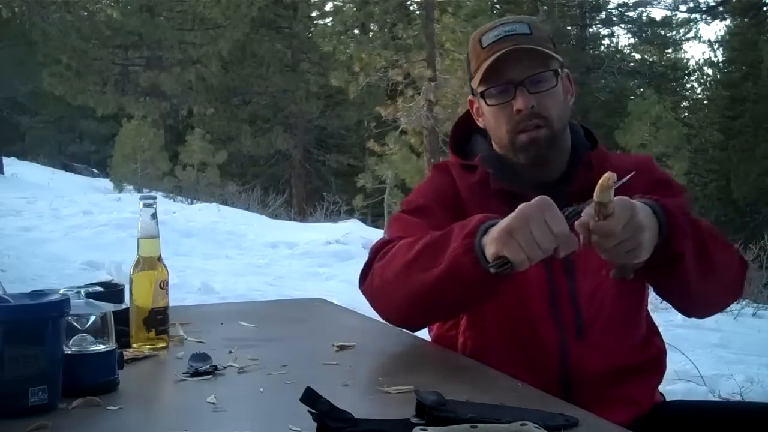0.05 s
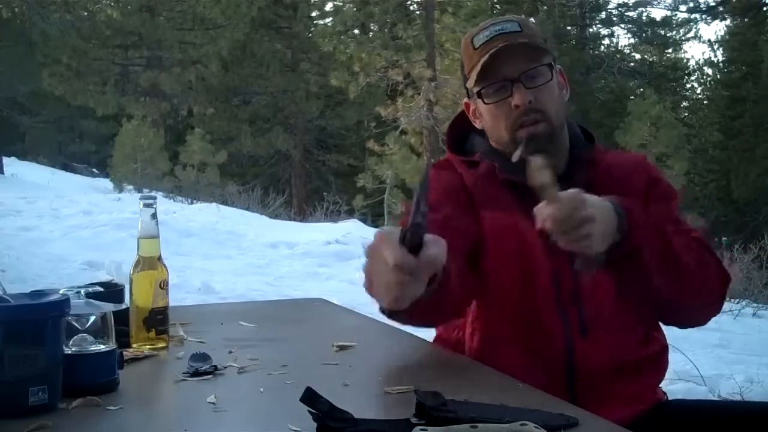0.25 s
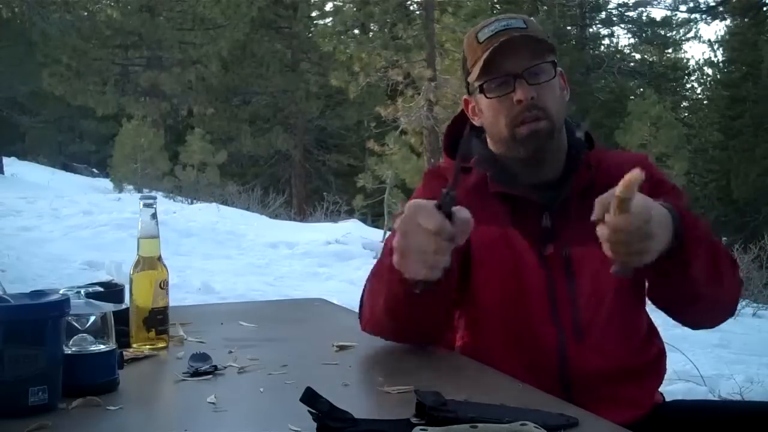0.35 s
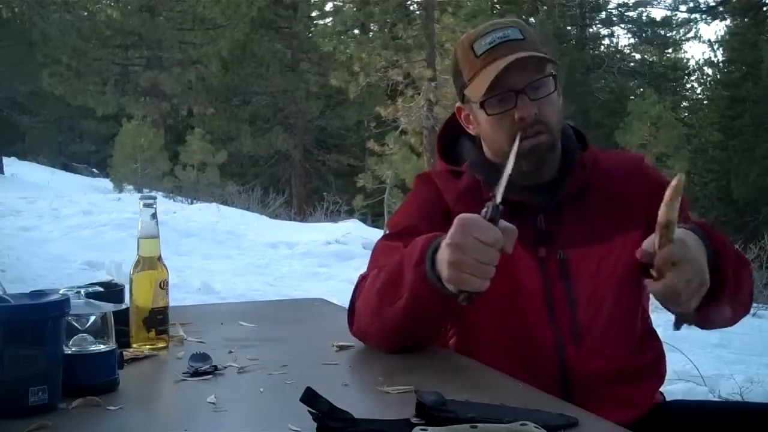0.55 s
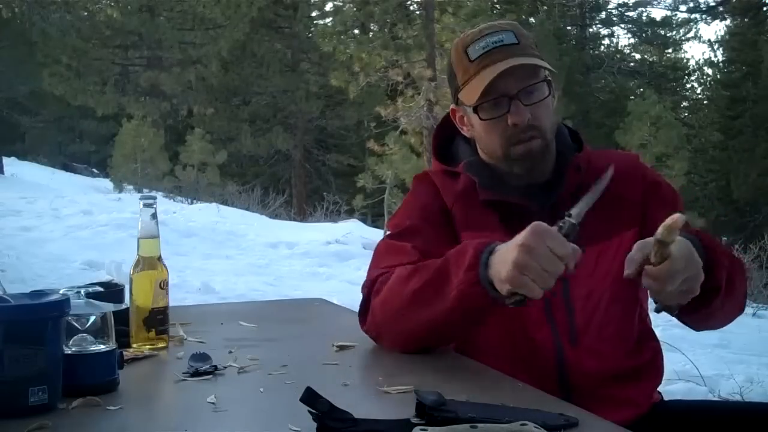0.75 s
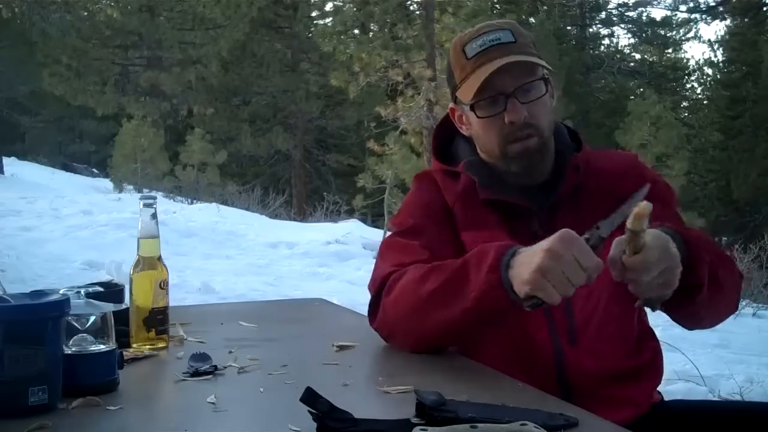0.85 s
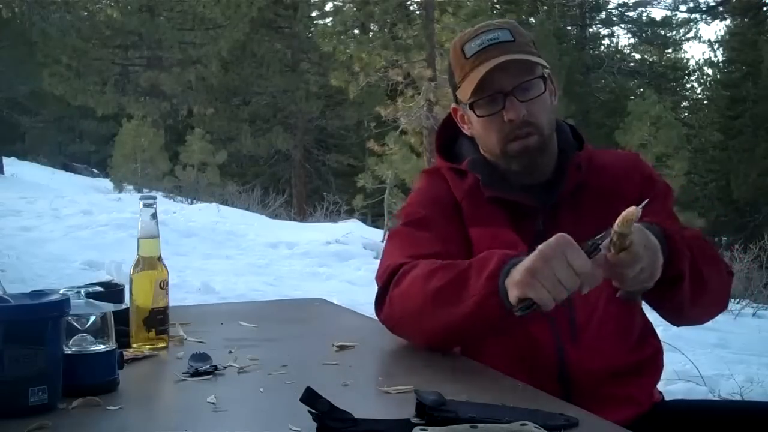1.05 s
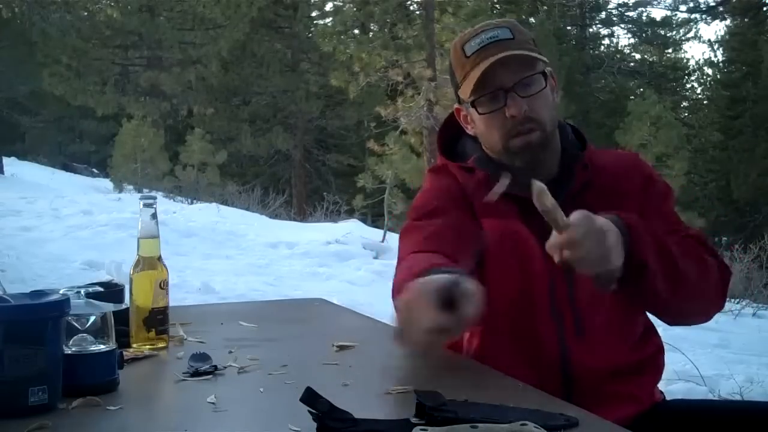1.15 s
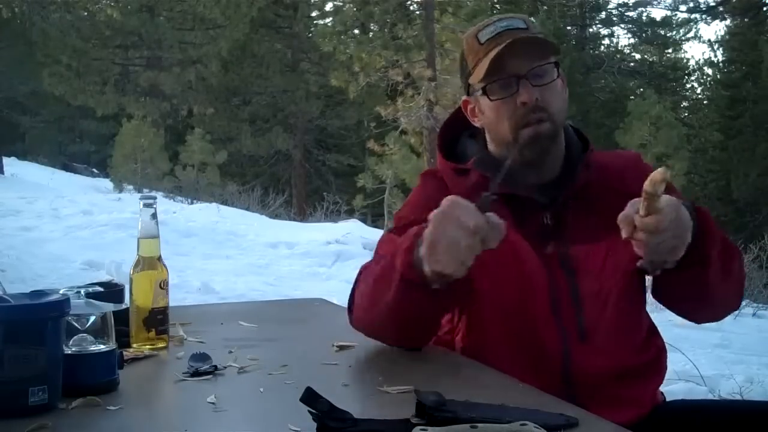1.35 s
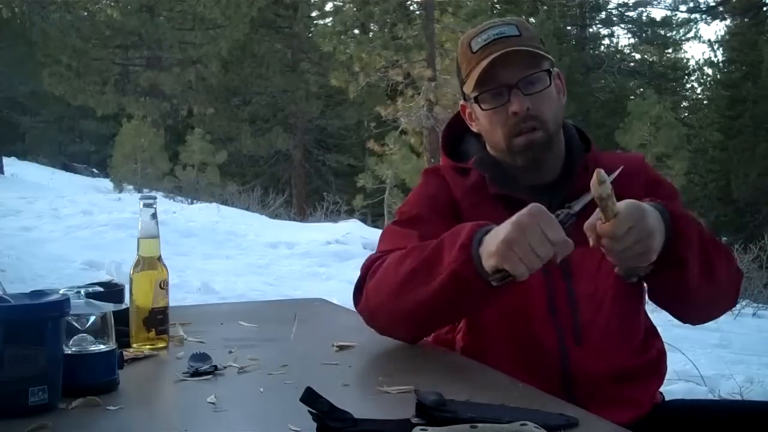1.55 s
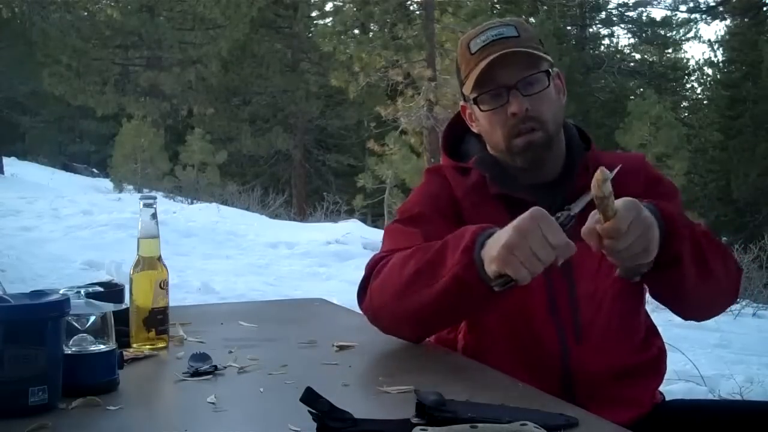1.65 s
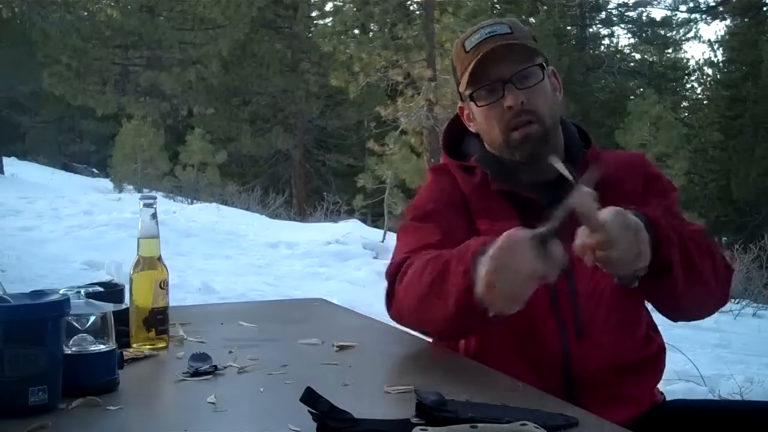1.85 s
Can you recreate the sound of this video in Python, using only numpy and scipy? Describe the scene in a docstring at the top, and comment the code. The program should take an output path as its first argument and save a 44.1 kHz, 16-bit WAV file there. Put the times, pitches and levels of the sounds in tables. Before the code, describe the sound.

A knife cuts a hard stick with two short sharp cracks about a second apart; light woody taps and a dry chip click follow, with jacket swish, in quiet open air, close stereo camera microphone.

```python
"""At a table in snowy woods, a knife slices two chips off a hard stick and taps it between cuts.
Random fibre slips and single blows excite the damped modes of the wood; the jacket's swish is
shaped noise that follows the arms, and still air is a steady noise. The camera's two ports differ in
the treble, and its electronics leak a faint frame-rate crackle, opposite in sign in the channels."""
import sys
import numpy as np
from scipy import signal
from scipy.fft import rfft, irfft, next_fast_len
from scipy.io import wavfile
from scipy.ndimage import uniform_filter1d

SR = 44100
rng = np.random.default_rng(int(sys.argv[2]) if len(sys.argv) > 2 else 0)


def wav_out(sig):
    """Save sig, one row per channel (or a flat mono array), as 16-bit PCM at SR to the path in sys.argv[1]."""
    wavfile.write(sys.argv[1], SR, np.round(np.clip(np.atleast_2d(sig).T, -1, 1) * 32767).astype(np.int16))


def to_linear_factor(level_db):
    """Convert decibel levels (scalar or array-like) to linear amplitude factors."""
    exponent = np.asarray(level_db, float) / 20
    return 10 ** exponent


N = 83790

# still air: (frequency [Hz], density [dB per Hz])
AIR = [(20, -21), (40, -12.5), (150, -4), (350, 2), (700, -2.5), (1300, -12.5), (3000, -13), (6000, -19.5),
       (9000, -22.5), (14500, -19), (15500, -66)]
AIR_DB = -64

# hiss of the electronics: (frequency [Hz], density [dB per Hz])
HISS = [(15, 42), (40, -3.5), (200, -1.5), (600, -34.5), (2000, -8), (6000, -27.5), (14500, -38),
        (15500, -44)]
# video frames, counted from the first, that carry a burst of spikes: (frame number)
BUSY_FRAMES = [0, 2, 4, 5, 7, 9, 11, 13, 15, 18, 20, 22, 24, 25, 27, 29, 31, 33, 35, 38, 40, 42, 44, 45, 47,
               49, 51, 53, 55, 56]
FRAME_S, FIRST_FRAME_S, BURST_S = 1001 / 30000, .0212, .009
WRITE_FIRST_S, WRITE_EVERY_S, WRITE_S = .205, .3337, .02  # memory writes
SPIKES_PER_S, SPIKE_S, COUPLING_HZ = 1200, .0001, 40.5
CRACKLE_DB, SAG_DB, HISS_DB = -47.5, -52.5, -64.5  # before the balance of the channels
LEAK_LEFT_DB = 1.92  # left over right

# jacket: (time [s], swish level [dB], level of the band near 2 kHz [dB])
JACKET = [(0, -67, -82), (.12, -69, -81), (.19, -69.5, -76), (.29, -59.5, -64.5), (0.361, -67, -69.5),
          (.46, -64, -73.5), (.49, -64, -71), (.6, -59.5, -65), (.69, -57, -65), (.77, -59.5, -64.5),
          (0.859, -57.5, -60.5), (.95, -64.5, -69), (1.1, -69.5, -76), (1.259, -59, -70.5),
          (1.32, -66.5, -69.5), (1.38, -64.5, -68), (1.5, -71.5, -81), (1.62, -76.5, -85),
          (1.8, -72, -77.5), (1.9, -64.5, -67.5)]
# spectrum of the swish: (frequency [Hz], density [dB per Hz])
CLOTH = [(2240, -13), (3800, -17), (4170, -10.5), (5940, -0.5), (8050, -6.5), (9760, -19.5), (11000, -16.5),
         (12500, -26.5), (14200, -20)]
# spectrum of the band near 2 kHz: (frequency [Hz], density [dB per Hz])
CLOTH_LOW = [(530, -35), (900, -17), (1200, -9.5), (2310, -3.5), (4200, -10), (5460, -6), (9240, -120)]
CLOTH_WIDTH_DB = -10.5  # gain of the unrelated part in each port

# right port over left: (frequency [Hz], level [dB], phase lead [rad])
PORTS = [(300, 3.5, 0), (1890, -1, 0.23), (3200, -0.5, 0.76), (4200, -1, 1.0), (5200, 1.5, 1.2),
         (5800, 4, 0.24), (7100, -8.5, 1.4), (7300, -50, -3.6), (8540, -8, 9), (10700, -10, 0),
         (13900, -58, 33)]

# resonances of a dry chip: (frequency [Hz], width [Hz], level [dB])
CHIP = [(4300, 1700, 1), (7680, 730, 8), (11500, 5700, -20)]
CHIP_S, CHIP_DB, RATTLE = 1.5501, -34, .13

# modes of the stick: (frequency [Hz], level [dB], t60 [s])
STICK = [(323.5, 4, 0.025), (624, -3.5, 0.017), (900, -2.5, 0.018), (1311, 0, 0.018), (1783, -11, 0.038)]
END_HZ, END_T60_S = 2980, .0075  # the cut end rings high and short
# resonances that cracks excite: (frequency [Hz], width [Hz], level [dB])
BRIGHT = [(2830, 850, -6), (4166, 620, -2), (5537, 800, -4), (6286, 410, 0.5), (7106, 370, 1.5),
          (7253, 348, 1), (11500, 4500, -27.5)]

# chips breaking free: (time [s], knock level [dB], centre of knock [Hz],
# ring of the cut end [dB], crack level [dB], centre of crack [Hz])
SNAPS = [(.2445, -33.5, 900, -59, -39, 6040), (.2541, -59, 1850, -16.5, -11.5, 6300),
         (.2563, -33.5, 1800, -30, -22, 6200), (.2616, -61, 1800, -50, -29.5, 6160),
         (.2636, -60, 1800, -56, -46, 5960), (1.2008, -39.5, 1180, -50, -36, 6540),
         (1.2068, -33.5, 380, -29, -34, 6000), (1.2095, -25.5, 1170, -49, -34, 4870),
         (1.2138, -54, 1210, -18, -25, 5600), (1.2188, -63, 1200, -52, -22, 5560)]
# blade and stick touching: (time [s], knock level [dB], centre of knock [Hz],
# ring of the cut end [dB], crack level [dB], centre of crack [Hz])
TAPS = [(0.0601, -37.5, 534, -55, -56.5, 6400), (0.0642, -53.5, 1300, -70, -58, 6250),
        (0.109, -78, 400, -83, -51.5, 5200), (0.343, -59, 1000, -62, -50.5, 5800),
        (0.9893, -33, 537, -52, -41.5, 6900), (.9935, -49.5, 1380, -70, -65, 6500),
        (1.034, -75, 600, -61, -50.5, 6000), (1.134, -54.5, 1400, -58, -60, 6000),
        (1.188, -50, 1300, -55, -57, 6000), (1.6631, -30.5, 1020, -26.5, -40.5, 6400),
        (1.6725, -63, 900, -57.5, -53.5, 6260), (1.7243, -47, 575, -54, -46, 6000),
        (1.7576, -64, 1500, -72, -49.5, 6600), (1.777, -72, 1520, -73, -52, 6000)]
KNOCK_OCTAVES, CRACK_OCTAVES = 0.58, 0.68  # distance from the centre for a loss of 6 dB
KNOCK_ATTACK_S, CRACK_T60_S, CRACK_NOISE = .0005, .003, .3
GRIP_DB = -12.5  # the lowest mode, the gripped stick, answers every blow at least this much

# one curve for each cut: (time [s], level of the stick's knock [dB], level of tearing fibres [dB])
CUTS = [
    [(.195, -87, -68), (.207, -68, -54), (.218, -79, -68), (.226, -64, -51), (.236, -42.5, -46.5),
     (.246, -37, -48), (.253, -54, -35.5), (.259, -42.5, -35.5), (.266, -63.5, -79), (.272, -77, -82),
     (.30, -65, -70)],
    [(1.17, -75, -60), (1.188, -61, -57), (1.198, -56, -48.5), (1.203, -51, -46), (1.208, -31, -38),
     (1.214, -34, -40), (1.218, -68, -33), (1.222, -40.5, -38), (1.227, -67, -68), (1.234, -55, -48.5),
     (1.24, -65.5, -60), (1.27, -59.5, -93)],
]
CUT_CENTRE_HZ, CUT_OCTAVES = [1100, 1700], 4.5  # where each cut shakes the stick most
SLIPS_PER_S, SLIP_SPREAD_DB = 9000, 3
LOW_HZ, TOP_HZ = 213, 14060  # a small stick gives no bass; the camera's top


def unit(x):
    """Normalisation to rms 1."""
    return x / np.sqrt(np.mean(x ** 2) + 1e-20)


def along(points, hz, axis=1):
    """Interpolation of one column of (frequency [Hz], ..) points on a log frequency axis."""
    columns = np.transpose(points)
    return np.interp(np.log(hz + 1), np.log(columns[0] + 1), columns[axis])


def near(hz, centre_hz, octaves):
    """Selective excitation: gain falls with the square of the distance in octaves from a centre."""
    return to_linear_factor(-6 * (np.log2((hz + 1) / centre_hz) / octaves) ** 2)


def filtered(x, response):
    """Linear filtering: the spectrum times a complex response of frequency."""
    size = next_fast_len(N + 8192)
    hz = np.fft.rfftfreq(size, 1 / SR)
    return irfft(rfft(x, size) * response(hz), size)[..., :N]


def resonances(rows):
    """Modal superposition: causal resonances of (frequency, width, level), alternating in sign."""
    def response(f):
        total = 0
        for k, (centre, width, db) in enumerate(rows):
            resonance = 1j * f * width / (centre * centre - f * f + 1j * f * width)
            total = total + (-1) ** k * to_linear_factor(db) * resonance
        return total
    return response


def rush(spectrum, patchy_db, channels):
    """Turbulent or frictional noise: coloured, of rms 1, with time-frequency patches of random gain."""
    z = signal.stft(rng.standard_normal((channels, N)), nperseg=256)[2]
    field = uniform_filter1d(rng.standard_normal(z.shape[1:]), size=5, axis=0)
    field = uniform_filter1d(field, size=10, axis=1)
    patchy = signal.istft(z * to_linear_factor(patchy_db * unit(field)), nperseg=256)[1][:, :N]
    return unit(filtered(patchy, lambda hz: to_linear_factor(along(spectrum, hz))))


def ports(x):
    """Interaural-like difference: one sound reaches two ports with unequal level and phase."""
    def response(hz):
        ratio = to_linear_factor(along(PORTS, hz)) * np.exp(1j * along(PORTS, hz, axis=2))
        return 2 * np.array([np.ones_like(ratio), ratio]) / (1 + ratio)  # the mean of both is x
    return filtered(x, response)


def still_air():
    """Stationary random pressure: noise unrelated between the ports."""
    return to_linear_factor(AIR_DB) * rush(AIR, patchy_db=2.5, channels=2)


def electronics():
    """Electrical coupling: high-passed spikes on busy frames and memory writes, over a low hiss."""
    t = np.arange(N) / SR
    busy = (t - WRITE_FIRST_S) % WRITE_EVERY_S < WRITE_S
    spikes, sag = np.zeros(N), np.zeros(N)
    for k in BUSY_FRAMES:
        u = (t - FIRST_FRAME_S - k * FRAME_S) / BURST_S
        inside = (u > 0) & (u < 1)
        busy |= inside
        spikes[np.argmax(u > 0)] = 1  # each burst opens with a full spike
        # the level swings from plus to minus across a burst
        sag += inside * np.sin(2 * np.pi * np.abs(u) ** 1.33) * rng.uniform(0.34, 1)
    chance, height = rng.random((2, N))
    spikes += busy * (chance < SPIKES_PER_S / SR) * (2 * height - 1)

    def pulse(hz, s):  # spectrum of a Gaussian pulse of peak 1
        return s * SR * np.sqrt(2 * np.pi) * np.exp(-2 * (np.pi * hz * s) ** 2)

    def shape(hz):
        high_pass = 1j * hz / (COUPLING_HZ + 1j * hz)
        return (pulse(hz, SPIKE_S) + 0.34 * pulse(hz, 4 * SPIKE_S)) * high_pass

    crackle = to_linear_factor(CRACKLE_DB) * filtered(spikes, shape)
    hiss = to_linear_factor(HISS_DB) * rush(HISS, patchy_db=-1, channels=1)[0]
    leak = crackle + to_linear_factor(SAG_DB) * sag + hiss
    return leak * to_linear_factor([[LEAK_LEFT_DB / 2], [-LEAK_LEFT_DB / 2]]) * [[1], [-1]]


def jacket():
    """Friction noise: stiff cloth swishes with the arms, in a shared part and a spread part."""
    s, high_db, low_db = np.transpose(JACKET)
    t = np.arange(N) / SR
    high = to_linear_factor(np.interp(t, s, high_db)) * rush(CLOTH, patchy_db=1.1, channels=3)
    low = to_linear_factor(np.interp(t, s, low_db)) * rush(CLOTH_LOW, patchy_db=2, channels=3)
    cloth = high + low
    return cloth[0], to_linear_factor(CLOTH_WIDTH_DB) * cloth[1:]


def chip():
    """Impulse response: a dry chip gives a sharp wide click with a faint lead-in and rattle."""
    t = np.arange(N) / SR - CHIP_S
    rattle = RATTLE * rng.standard_normal(N) * (t > -.001) * to_linear_factor(-60 * np.abs(t) / 0.011)
    hit = (np.arange(N) == round(CHIP_S * SR)) + rattle
    click = filtered(hit, resonances(CHIP))
    return to_linear_factor(CHIP_DB) * click / np.abs(click).max()


def blows(rows):
    """Impact excitation: each contact rings modes near its centre, the cut end and a short crack."""
    out, t = np.zeros(N + SR), np.arange(SR // 16) / SR
    f = np.fft.rfftfreq(len(t), 1 / SR)
    attack = 1 - np.exp(-t / KNOCK_ATTACK_S)
    end = to_linear_factor(-60 * t / END_T60_S) * np.sin(2 * np.pi * END_HZ * t)
    lead = 16  # samples of room for the crack's zero-phase filter
    for s, knock_db, centre_hz, end_db, crack_db, crack_hz in rows:
        ring = np.zeros(len(t))
        for k, (hz, db, t60) in enumerate(STICK):
            least = to_linear_factor(GRIP_DB) if k == 0 else 0
            gain = (-1) ** k * max(near(hz, centre_hz, KNOCK_OCTAVES), least)
            ring += gain * to_linear_factor(db - 60 * t / t60) * np.sin(2 * np.pi * hz * t)
        puff = to_linear_factor(-60 * t / CRACK_T60_S) * (CRACK_NOISE * rng.standard_normal(len(t)) + (t == 0))
        colour = resonances(BRIGHT)(f) * near(f, crack_hz, CRACK_OCTAVES)
        crack = irfft(rfft(np.roll(puff, lead)) * colour, len(t))
        start = round(s * SR)
        out[start:][:len(t)] += (to_linear_factor(knock_db) * ring + to_linear_factor(end_db) * end) * attack
        out[start - lead:][:len(t)] += to_linear_factor(crack_db) * crack / np.abs(crack).max()
    return out[:N]


def fibre_slips():
    """Stick-slip as a random point process: sparse impulses of uneven strength, of rms 1."""
    happens = rng.random(N) < SLIPS_PER_S / SR
    strength = rng.standard_normal(N) * to_linear_factor(SLIP_SPREAD_DB * rng.standard_normal(N))
    return unit(happens * strength)


def cuts():
    """Forced modal vibration: fibres slip at random under the edge, knocking the stick and crackling."""
    t = np.arange(N) / SR
    out = np.zeros(N)
    for rows, centre_hz in zip(CUTS, CUT_CENTRE_HZ):
        s, knock_db, tear_db = np.transpose(rows)
        modes = []
        for hz, db, t60 in STICK + [(END_HZ, -8, END_T60_S)]:
            width_hz = np.log(1000) / (np.pi * t60)
            modes.append((hz, width_hz, db + 20 * np.log10(near(hz, centre_hz, CUT_OCTAVES))))
        for db, body in ((knock_db, resonances(modes)), (tear_db, resonances(BRIGHT))):
            body_rms = np.sqrt(np.mean(np.abs(body(np.arange(1, SR / 2))) ** 2))
            force = fibre_slips() * to_linear_factor(np.interp(t, s, db, -200, -200))
            out += filtered(force, body) / body_rms
    return out


def scene():
    """Superposition of still air, jacket, and knife on stick, whose small size radiates little bass."""
    air = still_air()
    cloth, spread = jacket()
    contacts = chip() + blows(SNAPS + TAPS) + cuts()
    knife = filtered(contacts, lambda hz: (1j * hz / (LOW_HZ + 1j * hz)) ** 3)
    return ports(knife + cloth) + spread + air


def top_cut(x):
    """Nothing passes above the cut-off."""
    return signal.sosfilt(signal.butter(12, 15400, fs=SR, output="sos"), x)


def record(dry):
    """Band limitation: the camera adds its leak and rolls off the top."""
    roll_off = lambda hz: to_linear_factor(-.03 * np.clip(hz - TOP_HZ, 0, None))  # 0.03 dB per Hz
    heard = filtered(dry + electronics(), roll_off)
    return top_cut(heard)


dry = scene()
out = record(dry)
wav_out(out)
```